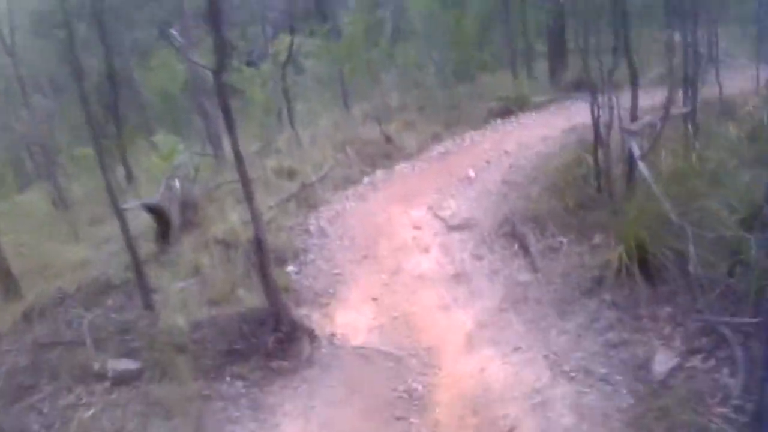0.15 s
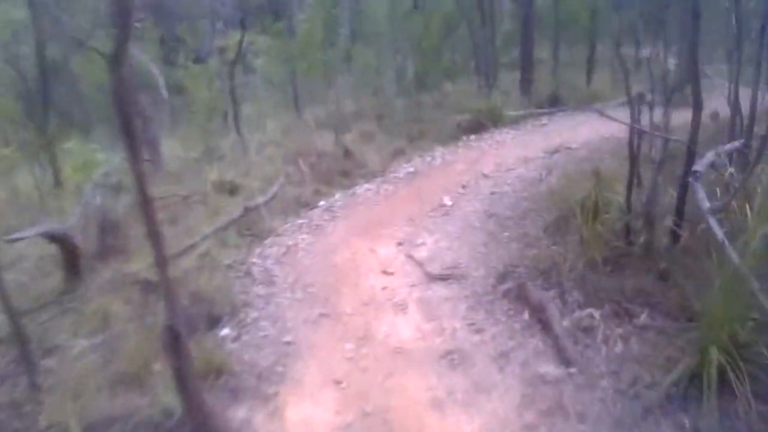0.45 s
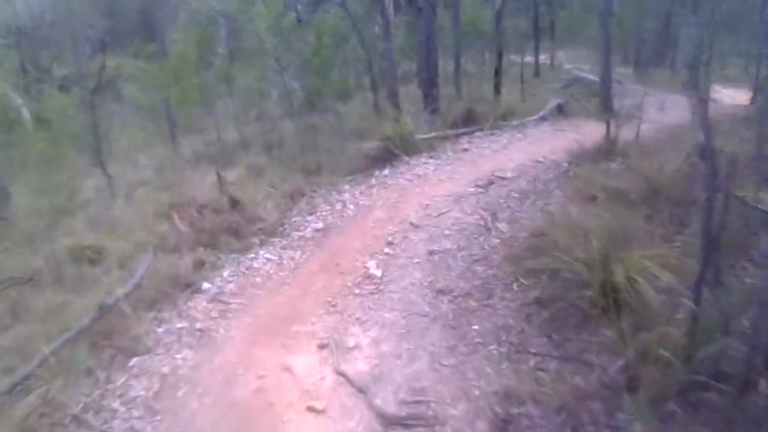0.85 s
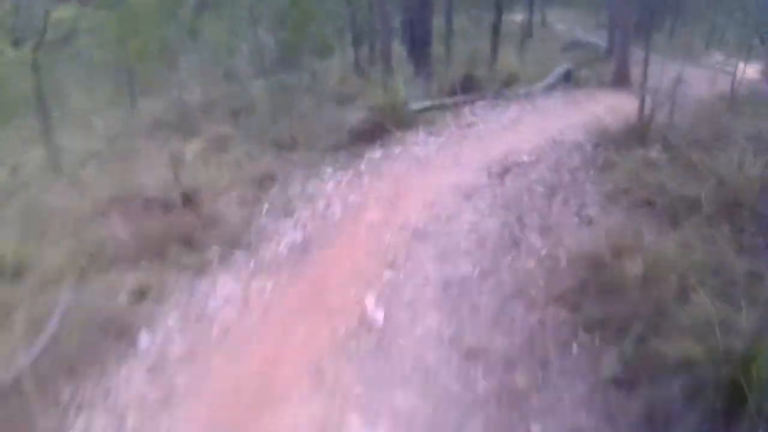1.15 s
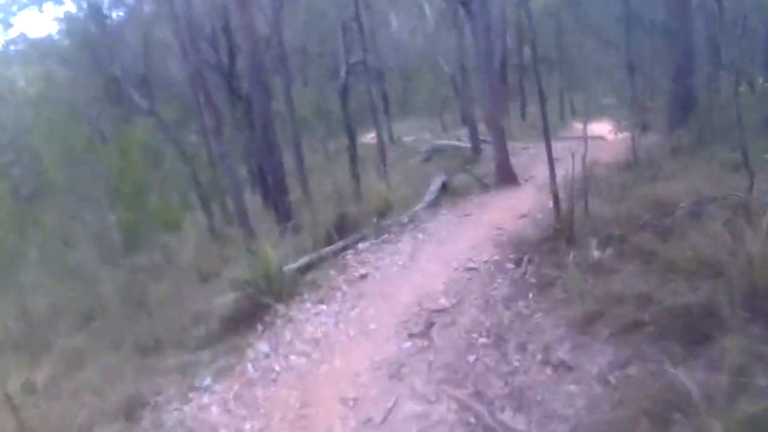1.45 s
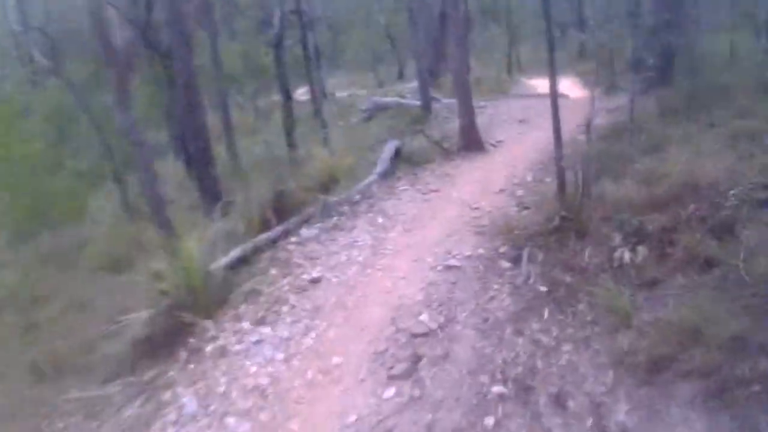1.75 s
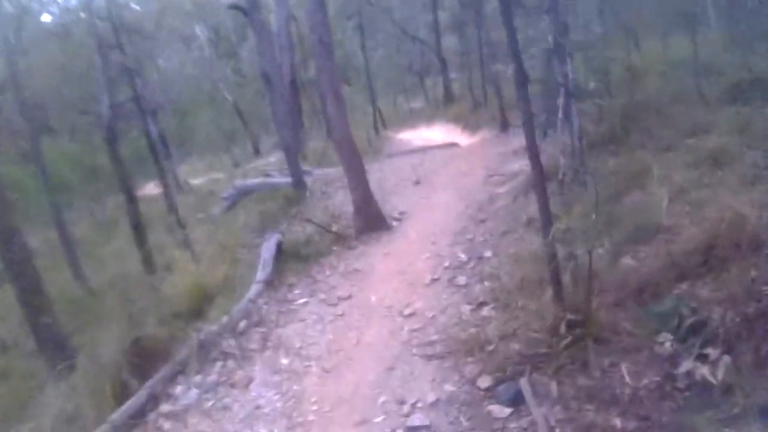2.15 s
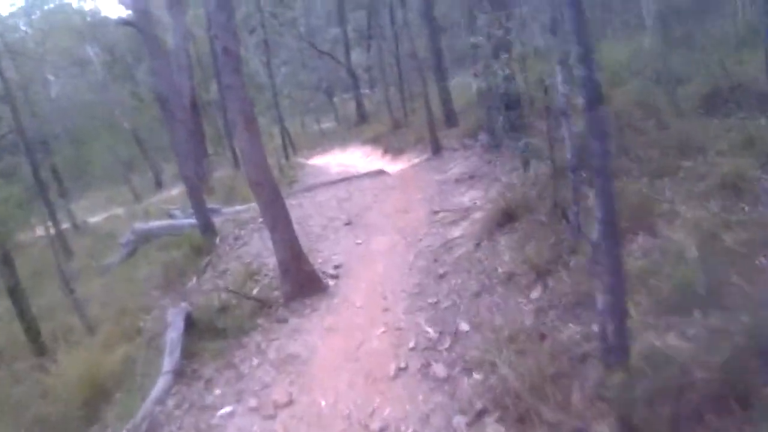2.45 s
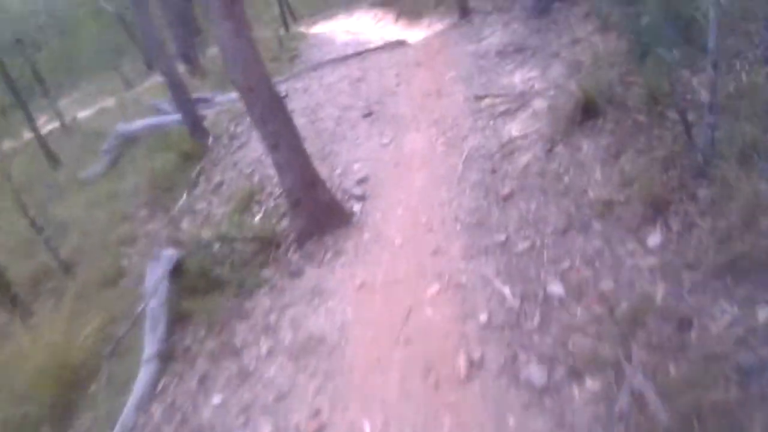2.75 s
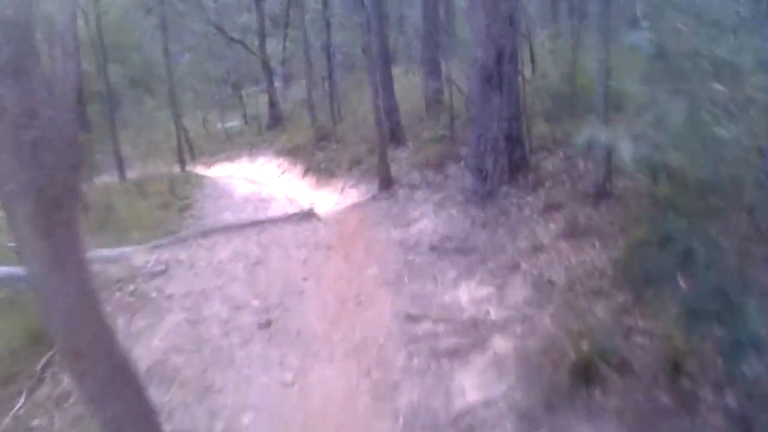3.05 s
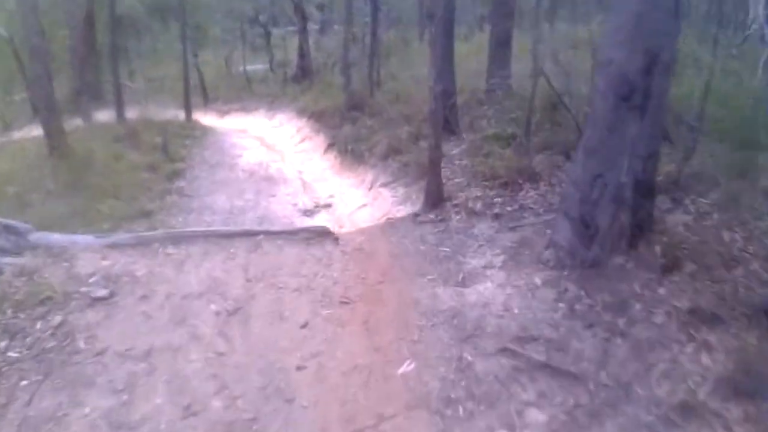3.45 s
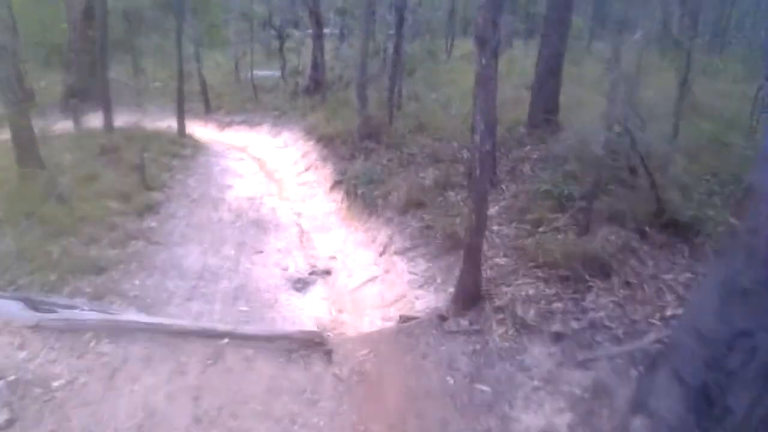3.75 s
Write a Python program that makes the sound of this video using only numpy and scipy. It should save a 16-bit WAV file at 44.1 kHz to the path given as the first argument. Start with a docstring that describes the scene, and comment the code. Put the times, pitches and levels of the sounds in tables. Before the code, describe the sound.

Mountain bike tyres crunch over a stony dirt trail with muffled knocks, rattles and low wind

```python
"""Stones crunch under the tyres of a mountain bike on a stony trail: random cracks over filtered hiss.
A small camera sealed in its case on the bike hears it. Scrunches are swelling bands of grainy noise,
knocks and thuds are decaying rings, grit and rattles are short noisy ticks, and a whirr is narrow noise.
A wavering tone makes the frame hum and low filtered noise makes the wind; the case muffles the treble."""
import sys
import numpy as np
from scipy import signal
from scipy.fft import rfft, irfft
from scipy.io import wavfile
from scipy.ndimage import uniform_filter1d

SR = 44100
rng = np.random.default_rng(int(sys.argv[2]) if len(sys.argv) > 2 else 0)


def waveform_to_disk(signal):
    """Save audio, clipped to [-1, 1], as 16-bit WAV at the path in sys.argv[1]."""
    frames = np.transpose(np.atleast_2d(signal))
    scaled = np.clip(frames, -1, 1) * 32767
    samples = np.round(scaled).astype(np.int16)
    wavfile.write(sys.argv[1], SR, samples)


def magnitude_from_level(level_db):
    """Linear magnitude for a level in decibels (20 dB per decade)."""
    exponent = np.asarray(level_db, float) / 20
    return 10 ** exponent


N = 171990  # length [samples]
T = np.arange(N) / SR  # time [s]

# wind strength, before gusts: (time [s], level [dB])
WIND_LEVEL = [(0, -43), (.9, -42.5), (1.3, -33.5), (2.0, -45), (3.9, -41.5)]
# relative colour of the wind: (frequency [Hz], gain [dB])
WIND_COLOUR = [(12, -29), (22, -3.5), (45, 0.5), (80, -4), (150, -6), (300, -12), (700, -41.5),
               (2500, -110)]
# spells of frame hum, before wavering: (start [s], length [s], level [dB])
HUM_SPELLS = [(0.184, 0.1, -41), (0.4, 0.19, -48), (1.045, 0.19, -44.5), (1.341, 0.24, -33),
              (1.91, 0.14, -46), (3.443, 0.084, -41.5)]
# pitch glide of the rubbing whirr: (time [s], pitch [Hz])
WHIRR_PITCH = [(2.71, 721), (2.785, 1007), (2.845, 1008), (2.895, 782)]
# bursts of loose parts: (start [s], relative level [dB])
RATTLE_BURSTS = [(0.0622, -72), (0.1037, -68), (0.1132, -61), (0.2707, -64), (0.303, -58.5),
                 (0.4531, -63.5), (0.4774, -61), (.838, -70.5), (0.855, -73), (.873, -64), (0.9209, -69),
                 (0.9498, -53.5), (0.9564, -59), (1.1329, -55), (1.1453, -62.5), (1.2103, -54),
                 (1.2873, -53), (1.2925, -61.5), (1.3661, -65), (1.49, -66), (1.4995, -57), (1.525, -56),
                 (1.6184, -61.5), (1.6558, -59), (1.7724, -60.5), (1.8079, -63), (1.8821, -64.5),
                 (1.9028, -57.5), (1.9699, -55.5), (2.0692, -64.5), (2.1807, -57.5), (2.2274, -62),
                 (2.397, -60), (2.419, -67), (2.4825, -70), (2.5104, -63.5), (2.532, -68), (3.022, -67.5),
                 (3.0685, -62)]
# treble of a rattle tick through the case: (frequency [Hz], gain [dB])
TICK_TREBLE = [(3700, -9.5), (4600, 2), (5500, -4), (6800, -23), (9200, -6), (10500, -19), (12500, -15),
               (14000, -26.5), (15600, -38)]
# body of a rattle tick through the case, also the colour of grit: (frequency [Hz], gain [dB])
TICK_BODY = [(300, -5.5), (1000, -1.5), (1800, 10), (2400, 0), (3000, -11.5), (3600, -17.5), (4200, -61.5)]
# deep thuds: (time [s], relative level [dB], settled pitch of the low ring [Hz])
THUD_HITS = [(.176, -19.5, 156), (.953, -14.5, 145.6), (1.135, -19, 277), (1.527, -16.5, 148.6),
             (1.538, -18, 171), (3.865, -24, 231)]
# bumps that knock the case: (time [s], relative level [dB], favoured pitch [Hz])
KNOCK_HITS = [(0.144, -12.5, 940), (0.407, -19.5, 1070), (0.588, -19.5, 1070), (0.596, -13.5, 1310),
              (0.878, -17, 1110), (0.919, -18, 568), (1.013, -17, 740), (1.144, -14.5, 460),
              (1.281, -16.5, 600), (1.37, -17, 600), (1.505, -13, 803), (1.706, -16.5, 1120),
              (1.77, -14.5, 1000), (1.807, -15.5, 679), (1.818, -7, 940), (1.845, -14, 1050),
              (1.853, -8.5, 964), (1.87, -12, 660), (1.879, -7.5, 1046), (1.888, -9.5, 850),
              (1.965, -19, 850), (2.117, -18, 1110), (2.396, -22.5, 870), (2.746, -24, 880),
              (3.16, -19.5, 900), (3.406, -12, 582), (3.6809, -5.5, 1130), (3.772, -13.5, 1150),
              (3.783, -10.5, 1100), (3.791, -12, 1120)]
# ringing modes of case and mount: (nominal frequency [Hz], relative level [dB], 60 dB decay [s])
CASE_MODES = [(460, 5, 0.017), (580, -8, 0.022), (800, -6, 0.028), (950, -0.5, 0.016), (1130, -3, 0.017),
              (1560, -4, 0.009), (2170, -8.5, 0.017), (2620, -8.5, 0.013)]
# loose patches: (centre [s], time from peak to 1/e [s], level [dB], centre frequency [Hz])
LOOSE_PATCHES = [(0.518, 0.049, -33.5, 950), (0.942, 0.045, -30.5, 800), (1.066, 0.009, -29.5, 950),
                 (1.15, 0.024, -25.5, 554), (1.293, 0.03, -26, 723), (1.509, 0.011, -25.5, 930),
                 (1.539, 0.015, -21.5, 533), (1.719, 0.029, -31, 880), (1.871, 0.061, -26, 800),
                 (3.345, 0.018, -28.5, 470), (3.435, 0.02, -25, 660), (3.483, 0.049, -31.5, 450)]
# tyre crunch, before flicker: (time [s], level [dB], extra treble level [dB])
TYRE_LEVEL = [(.6, -42.5, 0.5), (.78, -46.5, -9.5), (1.0, -43.5, -3), (2.0, -36, -5.5), (2.45, -42, 1),
              (3.25, -41, 4), (3.5, -35.5, -7.5)]
# relative colour of the crunch through the case: (frequency [Hz], gain [dB])
CRUNCH_COLOUR = [(100, -24), (250, -7), (400, -7.5), (700, -3.5), (1000, -1), (1200, -3), (1450, -15),
                 (1650, -13), (2040, -27.5), (2400, -23), (3000, -38), (3450, -32), (3800, -52),
                 (4400, -62), (9000, -95.5)]
# narrow dips in the response: (centre [Hz], width [Hz])
RESPONSE_DIPS = [(3980, 220), (6000, 200), (7950, 630)]


def curve(table, col=1):
    """A table column joined by straight lines in time."""
    points = np.array(table, float)
    return np.interp(T, points[:, 0], points[:, col])


def unit(x):
    """Scaled to rms 1."""
    return x / np.sqrt(np.mean(x ** 2))


def colour(x, table, size=4096):
    """Causal minimum-phase filter whose gain follows (frequency [Hz], gain [dB]) points."""
    points = np.array(table, float)
    hz = np.maximum(np.arange(size // 2 + 1) * SR / size, 1)
    gain_db = np.interp(np.log(hz), np.log(points[:, 0]), points[:, 1])
    # fold the cepstrum forward in time to get minimum phase
    cepstrum = irfft(np.log(magnitude_from_level(gain_db)))
    cepstrum[1:size // 2] *= 2
    cepstrum[size // 2 + 1:] = 0
    impulse = irfft(np.exp(rfft(cepstrum)))
    return signal.fftconvolve(x, impulse)[:N]


def split(x, hz, kind):
    """Low, high or band part of a sound."""
    return signal.sosfilt(signal.butter(2, hz, kind, fs=SR, output="sos"), x)


def walk(rate):
    """Random levels held 1 / rate s and slewed twice, scaled to rms 1."""
    hold = int(SR / rate)
    steps = np.repeat(rng.standard_normal(N // hold + 1), hold)
    return unit(uniform_filter1d(uniform_filter1d(steps, hold), hold)[:N])


def decay(t60_s):
    """Per-sample factor of a 60 dB fall in t60_s."""
    return magnitude_from_level(-60 / (t60_s * SR))


def wind():
    """Low buffeting: filtered noise whose level gusts at random."""
    gust_db = 1.5  # rms
    buffet = unit(colour(rng.standard_normal(N), WIND_COLOUR, size=16384))
    return buffet * magnitude_from_level(curve(WIND_LEVEL) + gust_db * walk(9))


def hum():
    """A low frame resonance that wavers in pitch and level and comes in soft-edged spells."""
    hum_hz, waver, edge_s = 105, 0.04, 0.03  # waver: rms fraction of the pitch
    phase = 2 * np.pi * np.cumsum(hum_hz * (1 + waver * walk(23))) / SR
    gain = np.zeros(N)
    for start, length, db in HUM_SPELLS:
        outside = np.abs(T - start - length / 2) - length / 2
        gain += magnitude_from_level(db) / (1 + np.exp(np.clip(4 * outside / edge_s, -50, 50)))
    return np.sqrt(2) * gain * magnitude_from_level(3.4 * walk(30)) * np.sin(phase)


def whirr():
    """Something rubs briefly: a narrow, broken band of noise glides, rises and falls."""
    centre_s, half_s, level_db = 2.795, 0.095, -38
    phase = 2 * np.pi * np.cumsum(curve(WHIRR_PITCH)) / SR
    rough = walk(110) * np.sin(phase) + walk(110) * np.cos(phase)
    return magnitude_from_level(level_db) * np.exp(-((T - centre_s) / half_s) ** 4) * rough


def rattles():
    """Loose parts tick in short bursts, the weak ones ending sooner; every tick has a brief noisy tail."""
    half_gain_s, longest_at_db = 0.013, -60  # full burst length, and the level that reaches it
    ticks_per_s, tick_t60_s, tick_spread_db = 260, 0.0048, 3.5
    level_db, body_db = 7.5, 28  # body relative to treble
    gain, first, chance = np.zeros(N), np.zeros(N), rng.random((N, 2))
    for start, db in RATTLE_BURSTS:
        age = (T - start) / (half_gain_s * magnitude_from_level(min(db - longest_at_db, 0) / 2))
        gain += magnitude_from_level(db) * (age >= 0) / (1 + np.clip(age, 0, 9) ** 4)
        first[int(start * SR) + 1] = 1  # each burst opens with a full tick
    others = (chance[:, 0] < ticks_per_s / SR) * magnitude_from_level(-tick_spread_db * chance[:, 1])
    tails = signal.lfilter([1], [1, -decay(tick_t60_s)], np.maximum(first, others))
    ticks = gain * tails * rng.standard_normal(N)
    return magnitude_from_level(level_db) * (colour(ticks, TICK_TREBLE) + magnitude_from_level(body_db) * colour(ticks, TICK_BODY))


def grit():
    """Stray small stones flick against the frame at random: decaying specks of filtered noise."""
    hits_per_s, strongest_db, spread_db, t60_s = 73, -36.5, 12, 0.009  # levels before colouring
    chance = rng.random((N, 2))
    hits = (chance[:, 0] < hits_per_s / SR) * magnitude_from_level(strongest_db - spread_db * chance[:, 1])
    tails = signal.lfilter([1], [1, -decay(t60_s)], hits)
    return colour(tails * rng.standard_normal(N), TICK_BODY)


def thuds():
    """A low ring that sags in pitch, with a higher mode on top."""
    low_t60_s, upper_hz, upper_db, upper_t60_s, rise_s = 0.083, 582, 2.5, 0.053, 0.0045
    out = np.zeros(N)
    for start, db, hz in THUD_HITS:
        t = np.clip(T - start, 0, 1)
        sag = 0.21 * 0.016 * (1 - np.exp(-t / 0.015))  # the pitch starts about 22 % high
        low = np.sin(2 * np.pi * hz * (t + sag)) * magnitude_from_level(-60 * t / low_t60_s)
        upper = np.sin(2 * np.pi * upper_hz * t) * magnitude_from_level(upper_db - 60 * t / upper_t60_s)
        out += magnitude_from_level(db) * (1 - np.exp(-t / rise_s)) * (low + upper)
    return out


def knocks():
    """Each blow and its small bounce ring the case, most near the favoured pitch, the first cycles louder."""
    favour_oct, level_db, rise_s, snap_cycles = 0.57, -2, 0.00084, 2.5
    bounce_s, bounce_db = 0.00608, -7  # averages; each blow varies them by up to half
    out, t = np.zeros(N + SR), np.arange(SR // 10) / SR
    hz, db, t60 = np.array(CASE_MODES, float).T[:, :, None]
    chances = rng.random((len(KNOCK_HITS), 2, len(CASE_MODES), 1))
    for (start, peak_db, pitch_hz), chance in zip(KNOCK_HITS, chances):
        distance = np.abs(np.log2(hz / pitch_hz)) / favour_oct
        weight = magnitude_from_level(db - 9 * distance - 60 * t / t60)
        mode_hz = hz * (1 + 0.051 * (chance[0] - 0.5))
        ring = (weight * np.sin(2 * np.pi * (mode_hz * t + 0.34 * chance[1]))).sum(0)
        snap = 0.71 + np.exp(-(t * pitch_hz / snap_cycles) ** 2)
        ring = ring * (1 - np.exp(-(t / rise_s) ** 2)) * snap
        ring = ring * magnitude_from_level(peak_db + level_db) / np.abs(ring).max()
        lag = bounce_s * (0.5 + chance[0, 0, 0])
        bounce_gain = magnitude_from_level(bounce_db * (0.5 + chance[1, 0, 0]))
        for delay, gain in ((0, 1), (lag, bounce_gain)):
            i = int((start + delay) * SR)
            out[i:i + len(t)] += gain * ring
    return split(out[:N], 3600, "low")


def scrunches():
    """Grainy swells of crushed stones over loose patches, each a noise band around its own pitch."""
    width_oct, rough_db = 1.23, 4
    out = np.zeros(N)
    for centre, half, db, hz in LOOSE_PATCHES:
        edges = hz * 2 ** (np.array([-0.5, 0.5]) * width_oct)
        grains = rng.standard_normal(N) * magnitude_from_level(rough_db * walk(250))
        band = unit(split(grains, edges, "band"))
        out += band * magnitude_from_level(db) * np.exp(-((T - centre) / half) ** 2)
    return split(split(out, 2000, "low"), 2000, "low")


def tyres():
    """Stones of uneven size crack over a hiss; bass, middle and treble also flicker apart."""
    stones_per_s, spread_db, max_db = 600, 3.5, 8.5
    hiss_db, flicker_db = -4, 2.5  # hiss relative to the stones; flicker shared by all bands
    chance = rng.random((N, 3))
    size_db = np.minimum(-spread_db * np.log(1 - chance[:, 2]), max_db)
    stones = (chance[:, 0] < stones_per_s / SR) * np.sign(chance[:, 1] - 0.5) * magnitude_from_level(size_db)
    crunch = unit(colour(unit(stones) + magnitude_from_level(hiss_db) * rng.standard_normal(N), CRUNCH_COLOUR))
    low, high = split(crunch, 420, "low"), split(crunch, 2000, "high")
    mid = split(split(crunch, 300, "high"), 1800, "low")
    level = magnitude_from_level(curve(TYRE_LEVEL) + flicker_db * walk(25.005))
    mid = mid * magnitude_from_level(1.32 * walk(40))
    low = low * magnitude_from_level(2.0 * walk(15))
    high = high * magnitude_from_level(curve(TYRE_LEVEL, col=2) + 3.3 * walk(14))
    return level * (mid - low - high)  # outer bands in reverse polarity


def scene():
    """Everything reaches one microphone."""
    background = wind() + hum() + whirr()
    hits = rattles() + grit() + thuds() + knocks()
    return (background + hits + scrunches() + tyres())[None]


def band_limit(x):
    """A steep low-pass at the top of the band."""
    return signal.sosfilt(signal.butter(12, 15600, fs=SR, output="sos"), x)


def record(dry):
    """Faint self-noise joins the sound, then narrow dips shape the treble."""
    self_noise_db = -104
    mix = dry + magnitude_from_level(self_noise_db) * rng.standard_normal(dry.shape)
    for hz, width_hz in RESPONSE_DIPS:
        mix = signal.lfilter(*signal.iirnotch(hz, hz / width_hz, SR), mix)
    return band_limit(mix)


dry = scene()
out = record(dry)
waveform_to_disk(out)
```